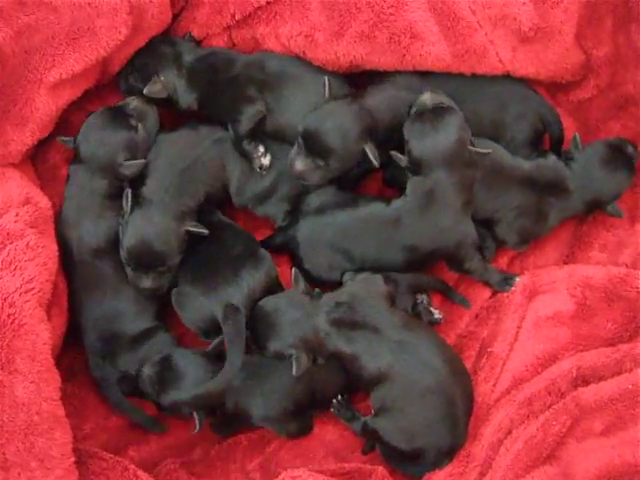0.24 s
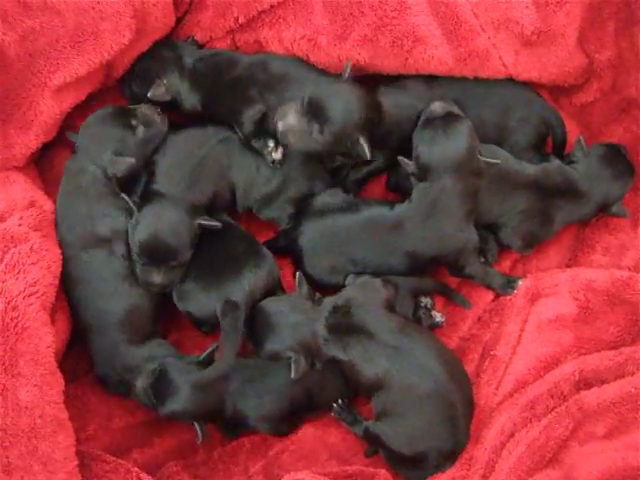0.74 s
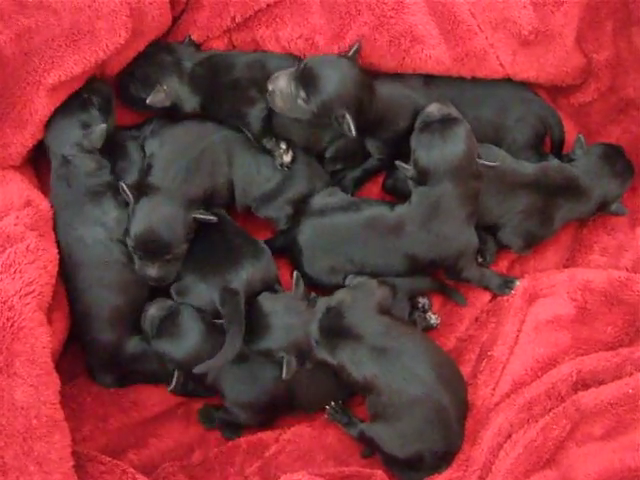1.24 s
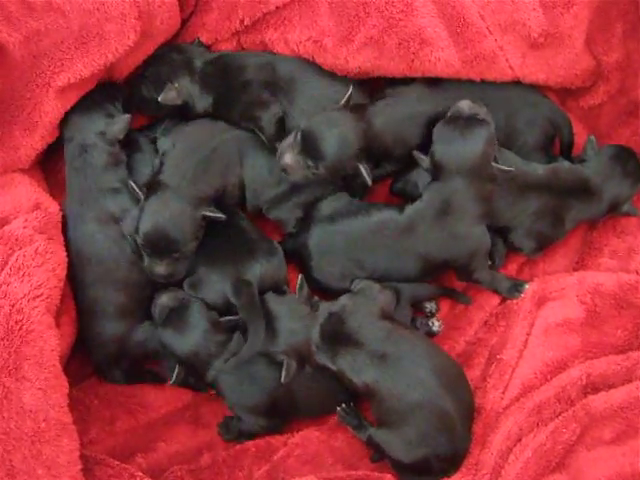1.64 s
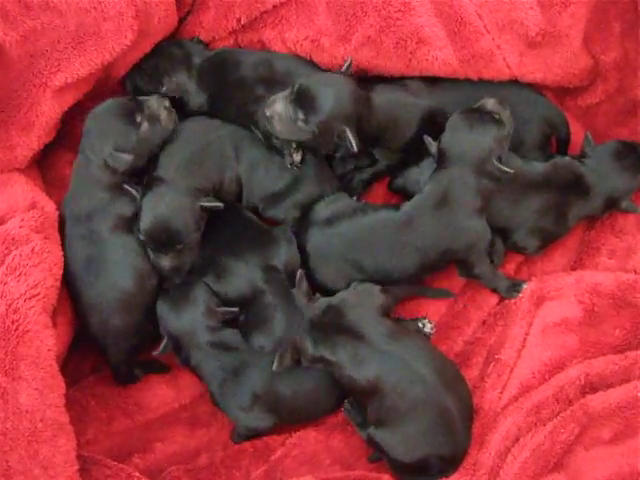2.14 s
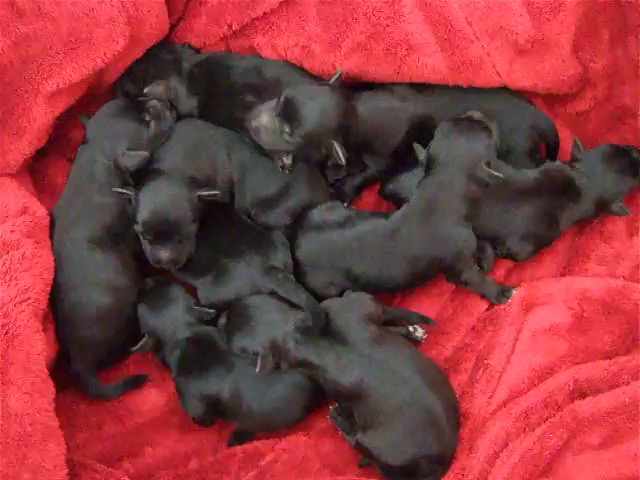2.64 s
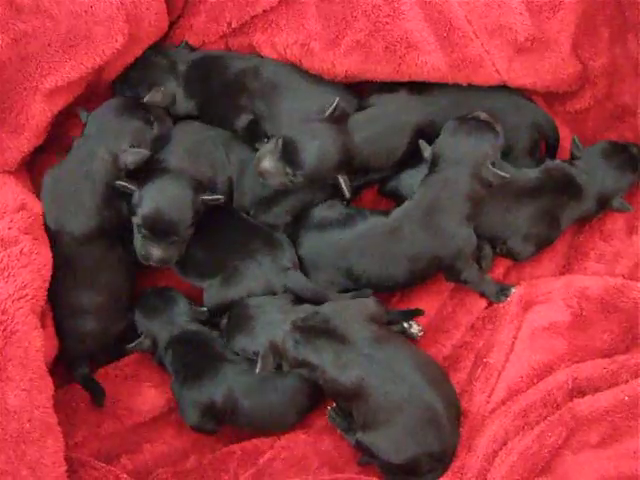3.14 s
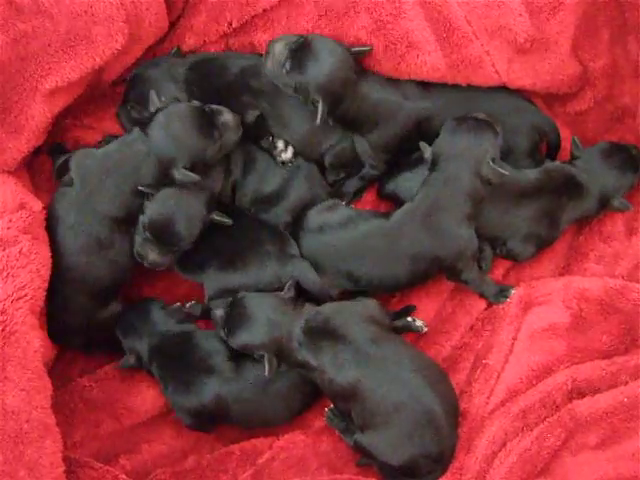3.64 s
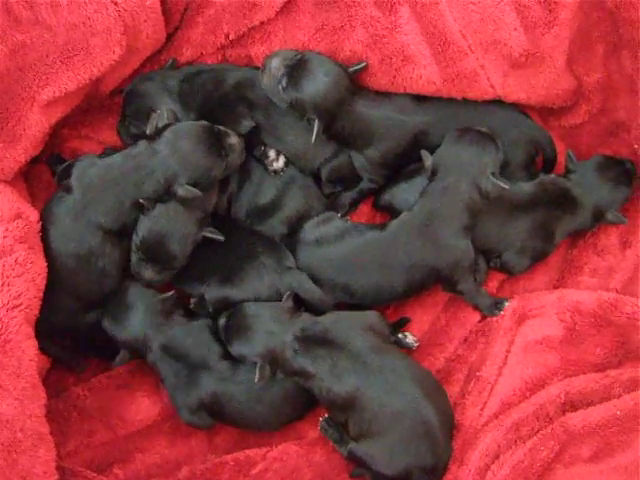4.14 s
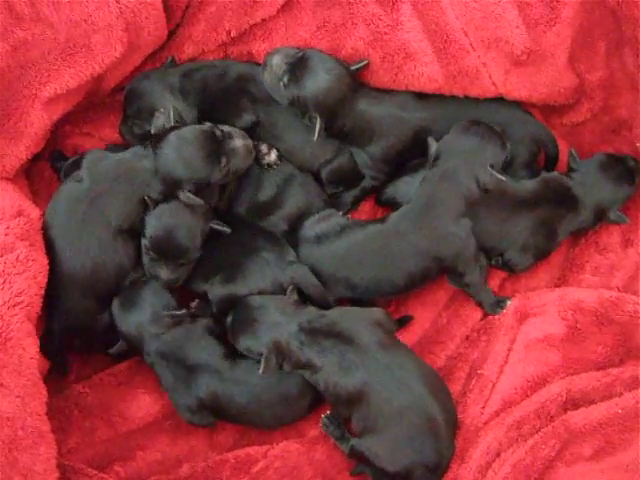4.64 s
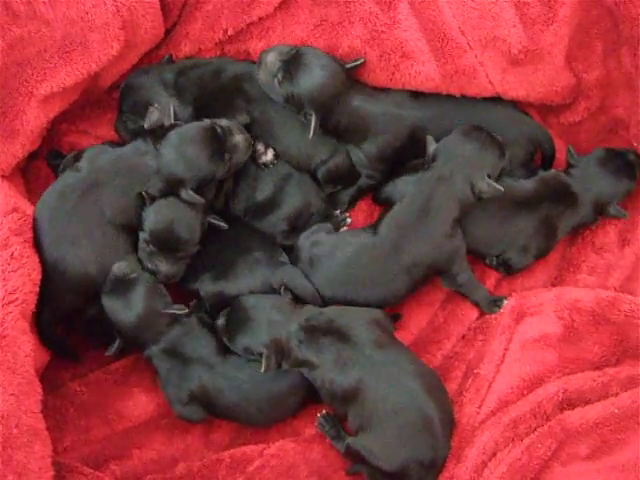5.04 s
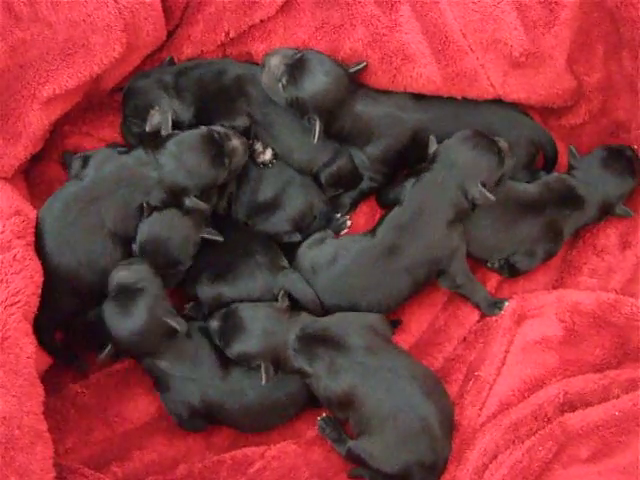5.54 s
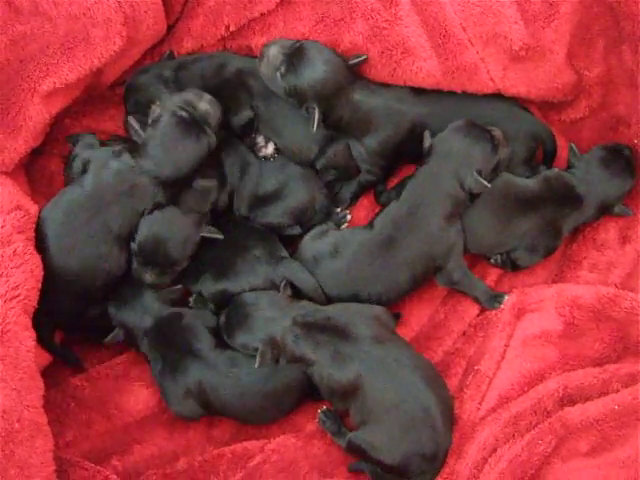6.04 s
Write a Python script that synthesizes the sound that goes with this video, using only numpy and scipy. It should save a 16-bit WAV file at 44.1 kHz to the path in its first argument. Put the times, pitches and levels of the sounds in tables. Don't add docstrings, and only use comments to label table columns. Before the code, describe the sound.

A low, unevenly swelling ventilation hum and soft hiss run throughout in a small furnished room, heard through a close, cheap microphone with limited treble. A very high, clear puppy mew is already sounding and snaps off in a hiccup near 0.27 s. Wet smacks and a hoarse grunt follow around 0.4 to 0.7 s, paws scuff at 0.8 s, with mouth clicks at 1.0 s and fainter rubbing near 1.3 s. A long, falling whine lasts from 1.5 to 2.3 s, its tail wavering, with faint moaning beneath. A short squeak comes at 2.8 s, low grunts around 3.5 s, then brief mews at 3.7 and 4.15 s, the second rising. Another long cry falls from 4.6 to 5.3 s, followed by a grunt, moan and scuff. A rising whimper at 5.55 s leads to stronger grunts from 6.03 s, a smack, and a final mew at 6.16 s, cut off.

```python
import sys
import numpy as np
from scipy import signal
from scipy.fft import rfft, irfft, next_fast_len
from scipy.io import wavfile
from scipy.ndimage import uniform_filter1d

SR = 44100
rng = np.random.default_rng(int(sys.argv[2]) if len(sys.argv) > 2 else 0)


def field_ratio(decibels):
    return 10 ** (np.asarray(decibels, dtype=float) / 20)


def transcribe(u):
    v = np.clip(np.atleast_2d(u).T, -1, 1)
    q = np.round(v * 32767).astype(np.int16)
    wavfile.write(sys.argv[1], SR, q)


N = 277816
TIME = np.arange(N) / SR

# pitch in Hz, width in Hz, level in dB.
DUCTS = [(54.8, 25, -4), (95.2, 18.2, -2), (122, 14, -57.5), (154.8, 16, -58.5), (295, 5.8, -66.5),
         (40, 45, -56)]
# time in seconds, level in dB.
DRAUGHT = [(0.0, -57), (0.09, -46), (1.47, -51), (1.51, -42.5), (2.09, -49.5), (2.17, -40), (2.74, -53),
           (3.07, -39), (3.16, -53.5), (3.93, -45), (3.98, -47.5), (4.42, -40.5), (4.54, -52.5),
           (5.33, -45), (5.86, -47.5), (5.89, -66), (6.09, -44.5), (6.3, -54)]
# frequency in Hz, level in dB per Hz.
AIR_COLOUR = [(110, -28), (180, -3.5), (260, -4.5), (290, -4), (351, -5), (585, -1), (755, -0.5),
              (817, 1.5), (1280, -4.5), (2030, -7.5), (2610, -9.5), (3430, -11.5), (8100, -14),
              (10500, -43), (17800, -120)]

# start in seconds, end in seconds, extra pitch at the onset in Hz,
# glide at the end in Hz, frequency ratio from the length of the throat and mouth (no unit).
MEW_EDGES = [
    (0, 0.268, -2.5, -20.5, 1.03),
    (1.522, 2.302, -3, -130, .98),
    (2.795, 2.943, 48.5, 24, 1.04),
    (3.691, 3.887, 218, 30.5, 1.107),
    (4.137, 4.379, 200, 369, 1.05),
    (4.628, 5.301, 329, -140, 1.002),
    (5.546, 5.881, -35, 299, 0.95),
    (6.159, 6.308, 238.5, -3.5, 1.036),
]
# upper resonance at first in Hz, later in Hz, time of the shift in seconds,
# its lift in dB, level of the valley below it in dB.
MOUTHS = [(6300, 7500, 0.076, -7.5, -6), (6080, 7600, 2.08, 4.5, 2.5), (6360, 3500, 3.9, 29, -1),
          (7000, 7300, 2.9, 10, 0.5), (7100, 7800, 5.9, 14.5, -3), (6000, 7100, 5.03, 3.5, -2),
          (6200, 6700, 5.64, 10, -8.5), (6500, 7100, 3.9, 13, -9.5)]
# time in seconds,
# pitch in Hz, effort in dB, slope of the fold pulses in dB per octave.
COURSE_1 = [(0.0, 1764, -20.5, -1), (0.028, 1742, -18.5, -4.5), (0.048, 1600, -19.5, -2.5),
            (0.092, 1506, -23, 0), (0.128, 1474, -22, -2.5), (0.17, 1634, -21, -2),
            (0.214, 1706, -21.5, -1.5), (0.242, 1638, -25, -3.5), (0.25, 1568, -24.5, -5)]
COURSE_2 = [(1.552, 1622, -30, -5.5), (1.56, 1514, -30, -7.5), (1.606, 1242, -25.5, -8),
            (1.656, 1125, -30, -4.5), (1.702, 1101, -26, -7.5), (1.778, 1222, -20, -7),
            (1.814, 1237, -14, -10), (1.978, 1160, -25.5, -3.5), (2.09, 1038, -28.5, -8),
            (2.11, 1058, -29.5, -6), (2.172, 1104, -33, -5.5), (2.206, 1064, -37.5, -2.5),
             (2.23, 1109, -36.5, -4.5), (2.26, 1110, -36, -8)]
# seconds, Hz, dB, dB per octave.
COURSE_3 = [(2.81, 1530, -33.5, -26), (2.832, 1405, -28, -15.5), (2.876, 1520, -33, -20),
            (2.896, 1610, -39, -14), (2.935, 1385, -34, -17)]
COURSE_4 = [(3.715, 1170, -24.5, -11), (3.733, 1219, -21.5, -7.5), (3.765, 1058, -30, -6),
            (3.819, 1032, -34.5, -5), (3.845, 958, -33.5, -6), (3.853, 875, -39, -10),
            (3.87, 856, -34, -8.5)]
COURSE_5 = [(4.16, 1112, -32.5, -10), (4.174, 1134, -28.5, -10), (4.24, 1229, -22.5, -5.5),
            (4.272, 1380, -29.5, -10), (4.31, 1350, -33, -9.5), (4.335, 1300, -36.5, -11)]
COURSE_6 = [(4.66, 1328, -31.5, -5.5), (4.7, 1308, -27.5, -0.5), (4.756, 1263, -21, -3.5),
            (4.882, 1248, -23, -3), (4.956, 1201, -22, -5), (5.078, 975.5, -31.5, -3.5),
            (5.124, 953, -24.5, -9.5), (5.18, 999, -33, -5.5), (5.255, 958, -29.5, -8)]
COURSE_7 = [(5.56, 925, -32, -11), (5.58, 947, -29, -6), (5.616, 1044, -27, -5), (5.658, 1090, -28, -7),
            (5.686, 1131, -30, -8), (5.708, 1176, -34, -5.5), (5.768, 1115, -36.5, -9.5),
            (5.784, 1133, -39.5, -8.5), (5.84, 1275, -39, -8.5)]
COURSE_8 = [(6.185, 1083, -30.5, -9.5), (6.221, 1133, -23.5, -10), (6.295, 1226, -26, -10.5)]
# frequency in Hz, level in dB.
TRACT = [(850, -9), (1100, 4), (1500, -9.5), (2000, -3), (2450, -2), (3050, -6), (3900, -23), (5200, -35.5)]

# time in seconds, peak in dB, centre in Hz, width in Hz.
SMACKS = [(.072, -54, 6700, 1500), (0.26, -40, 3000, 2500), (.432, -28.5, 870, 400),
          (.535, -48, 2210, 2500), (1.015, -35.5, 1600, 3000), (1.012, -56, 4610, 1200),
          (1.035, -43, 210, 120), (1.041, -44.5, 4580, 900), (1.761, -30, 3900, 3500),
          (1.844, -29, 3700, 5000), (2.205, -43, 7450, 201), (2.301, -38, 2800, 2200),
          (3.715, -48.5, 6020, 250), (3.722, -43, 4460, 1500), (4.629, -38.5, 1810, 500),
          (5.546, -44, 3003, 600), (6.113, -25, 840, 300), (6.276, -44, 6260, 1500)]
# time in seconds, peak in dB, start pitch in Hz,
# end pitch in Hz, level of the second partial in dB.
CATCHES = [
    (0.259, -28, 1550, 1005, -8),
    (.322, -45, 1110, 1026, -36),
    (2.294, -36.5, 1474, 1000, -1),
    (2.946, -41, 930, 880, -9),
    (3.884, -39, 796, 697, -5.5),
    (5.296, -31, 856, 1042, -12),
]
# start in seconds, length in seconds, peak in dB, pulses per second in Hz,
# mouth opening in dB.
GRUNTS = [
    (.37, .32, -49, 271.7, 0),
    (0.896, .14, -71, 232, 10.5),
    (3.44, .14, -45, 199.6, -8),
    (3.56, 0.1535, -48.5, 203, -6.5),
    (3.864, 0.051, -56, 200, -8),
    (5.29, 0.215, -49.5, 185, 2.5),
    (5.489, .05, -57.5, 193.6, 2),
    (6.031, 0.22, -40, 275, -2),
    (6.152, .16, -47, 278.5, 0),
]
# frequency in Hz, width in Hz, level in dB.
THROAT = [(810, 85, 0), (1140, 140, 3), (1650, 300, -10), (2300, 450, -11)]
# time in seconds, peak in dB, centre in Hz, width in Hz.
SCUFFS = [
    (.795, -36, 1200, 2600),
    (.8, -43, 4200, 1500),
    (1.27, -43, 3000, 3000),
    (1.292, -39.5, 3030, 3500),
    (2.546, -44, 2640, 3500),
    (3.24, -43.5, 2600, 3500),
    (5.285, -42.5, 2940, 1200),
    (5.452, -39, 3120, 2000),
]
# start in seconds, length in seconds, pitch in Hz, level in dB.
MOANS = [
    (1.68, .11, 620, -47.5),
    (2.062, 0.051, 660, -49),
    (4.14, 0.097, 750, -46),
    (4.64, 0.071, 750, -51.5),
    (4.63, 0.14, 1150, -52.5),
    (5.322, .14, 773, -50.5),
]
# frequency in Hz, level in dB.
MIRROR = [(8000, -3), (8400, -12), (8800, -25), (9200, -60.5)]

AIR_DB, SURGE_DB = -49.5, -1.65
NASAL_HZ, NASAL_WIDTH_HZ, NASAL_DEPTH = 1197, 118, 0.77
ONSET_S, ATTACK_S = .013, 0.012
ENDING_S, ENDING_HOLD, RELEASE_S = .022, 1.8, .014
MOUTH_WIDTH_HZ, MOUTH_SHIFT_S, MOUTH_FOLLOWS_PITCH = 750, 0.027, 0.25
VALLEY_FILLS_S, THIRD_FADES_HZ = .17, 3700
SMACK_S, SCUFF_S, RING_CYCLES = .002, .008, 2.2
CATCH_S = .019
GRUNT_SKEW, WAVER_DB = 0.92, 1.5
MOAN_DIP = 0.051
ROOM_T60_S, ROOM_DB, ROOM_DULL_HZ = .28, -16, 3200
CAMERA_RATE_HZ, OFFSET = 16000, -.0024


def shape(x, gain):
    size = next_fast_len(len(x) + 4096)
    f = np.arange(size // 2 + 1) * SR / size + 1e-3
    return irfft(rfft(x, size) * gain(f), size)[:len(x)]


def peak(f, hz, width):
    return 1 / (1 + 1j * (f / hz - hz / f) * hz / width)


def unit(x):
    return x / np.sqrt(np.mean(x ** 2))


def colour(table, f):
    hz, db = np.transpose(table)
    return field_ratio(np.interp(np.log(f), np.log(hz), db))


def walk(rate):
    return unit(shape(rng.standard_normal(N), lambda f: 1 / (1 + (f / rate) ** 2)))


def during(start, end):
    span = slice(int(start * SR), int(end * SR))
    return span, TIME[span]


def hum():
    flow_db = np.interp(TIME, *np.transpose(DRAUGHT))
    out = np.zeros(N)
    for i, (hz, width, db) in enumerate(DUCTS):
        swell_db = flow_db + SURGE_DB * walk(1.5) if i < 2 else walk(1.5)
        ringing = unit(shape(rng.standard_normal(N), lambda f: peak(f, hz, width) ** 2))
        out += field_ratio(db + swell_db) * ringing
    return out


def air():
    noise = rng.standard_normal(N)
    rush = field_ratio(AIR_DB) * unit(shape(noise, lambda f: colour(AIR_COLOUR, f) * (f > 170)))
    middle = shape(rush, lambda f: peak(f, 1300, 900))
    return rush + (field_ratio(1.1 * walk(5)) - 1) * middle


def mews():
    out, shimmer, jitter = np.zeros(N), walk(51), 1 + .002 * walk(35)
    patchy = [walk(14) for _ in range(6)]
    courses = (COURSE_1, COURSE_2, COURSE_3, COURSE_4,
               COURSE_5, COURSE_6, COURSE_7, COURSE_8)
    for course, edges, mouth in zip(courses, MEW_EDGES, MOUTHS):
        start, end, onset_hz, ending_hz, ratio = edges
        from_hz, to_hz, shift_s, lift_db, valley_db = mouth
        span, t = during(start, end)
        s, pitch_hz, effort_db, slope = np.transpose(course)
        slope_db = np.interp(t, s, slope)

        hz = np.interp(t, s, pitch_hz)
        for _ in range(2):
            hz = uniform_filter1d(hz, size=500, mode="nearest")
        glide = np.clip(ENDING_HOLD - (end - t) / ENDING_S, 0, 1)
        hz = hz + onset_hz * np.exp(-((t - start) / ONSET_S) ** 2)
        hz = (hz + ending_hz * glide ** 2 * (3 - 2 * glide)) * jitter[span]

        age = t - start + (start < .005)
        left = end - t + (end > TIME[-300])
        gate = np.clip(np.minimum(age / ATTACK_S, left / RELEASE_S), 0, 1)

        mouth_hz = from_hz + (to_hz - from_hz) / (1 + np.exp((shift_s - t) / MOUTH_SHIFT_S))
        mouth_hz = mouth_hz * (hz / np.median(hz)) ** MOUTH_FOLLOWS_PITCH
        valley = field_ratio(valley_db) * np.clip(age / VALLEY_FILLS_S, .1, 1)

        phase, tone = 2 * np.pi * np.cumsum(hz) / SR, 0
        for k in range(1, 10):
            lips = k * gate ** ((k - 1) / 2)
            nose = 1 - NASAL_DEPTH * np.abs(peak(k * hz, NASAL_HZ, NASAL_WIDTH_HZ)) ** 2
            gain = lips * colour(TRACT, k * hz * ratio) * field_ratio(slope_db * np.log2(k)) * nose
            if k == 3:
                below = np.clip(THIRD_FADES_HZ / (k * hz), 0, 1) ** 9
                gain = gain * (below + (1 - below) * valley)
            if k > 3:
                near = np.abs(peak(k * hz, mouth_hz, MOUTH_WIDTH_HZ)) ** 3
                away = valley * np.clip(5800 / (k * hz), 0, 1) ** 6
                gain = gain * field_ratio(3.0 * patchy[k - 4][span]) * (away + field_ratio(lift_db) * near)
            tone = tone + gain * np.sin(k * phase + (k - 1) ** 2)
        loudness = field_ratio(np.interp(t, s, effort_db) + 1.0 * shimmer[span])
        out[span] = np.sqrt(2) * tone * gate * loudness
    return out


def bursts(table, contact_s):
    out, t = np.zeros(N), np.arange(2500) / SR
    for s, db, hz, width in table:
        decay_s = contact_s + RING_CYCLES / width
        noise = rng.standard_normal(len(t)) * np.exp(-t / decay_s)
        burst = shape(noise, lambda f: peak(f, hz, width) ** 3)
        first = int(s * SR)
        out[first:][:len(t)] += (field_ratio(db) * burst / np.abs(burst).max())[:N - first]
    return out


def smacks():
    return bursts(SMACKS, SMACK_S)


def catches():
    out = np.zeros(N)
    u = np.arange(int(CATCH_S * SR)) / (CATCH_S * SR)
    for s, db, from_hz, to_hz, second_db in CATCHES:
        hz = to_hz + (from_hz - to_hz) * np.exp(-5 * u)
        phase = 2 * np.pi * np.cumsum(hz) / SR
        tone = np.sin(phase) + field_ratio(second_db) * np.sin(2 * phase)
        out[int(s * SR):][:len(u)] += field_ratio(db) * np.sin(np.pi * u ** .7) * tone
    return out


def grunts():
    hz, gain, opening = np.full(N, 200.), np.zeros(N), np.zeros(N)
    for start, length, db, rate_hz, open_db in GRUNTS:
        span, t = during(start, start + length)
        progress = np.abs(t - start) / length
        gain[span] += field_ratio(db) * np.abs(np.sin(np.pi * progress ** GRUNT_SKEW)) ** 1.2
        hz[span], opening[span] = rate_hz, field_ratio(open_db)

    cycle = np.cumsum(hz * (1 + .03 * walk(60)) / SR)
    size = field_ratio(2.5 * rng.standard_normal(N // 20))[cycle.astype(int)]
    pulses = unit(size * np.diff(np.floor(cycle), prepend=0))
    source = pulses + .9 * rng.standard_normal(N)

    rings = []
    for centre, width, db in THROAT:
        ring = unit(shape(source, lambda f: peak(f, centre, width) * peak(f, centre, 3 * width)))
        rings.append(field_ratio(db + WAVER_DB * walk(30)) * ring)
    low, second, third, fourth = rings
    return (low + opening * (third - second - fourth)) * gain


def scuffs():
    return bursts(SCUFFS, SCUFF_S)


def moans():
    out = np.zeros(N)
    for start, length, hz, db in MOANS:
        span, t = during(start, start + length)
        arch = np.sin(np.pi * (t - start) / length)
        phase = 2 * np.pi * np.cumsum(hz * (1 - MOAN_DIP * arch)) / SR
        tone = np.sin(phase) + field_ratio(-20.5) * np.sin(2 * phase)
        out[span] += np.sqrt(2 * np.abs(arch)) * field_ratio(db) * tone
    return out


def room(x):
    t = np.arange(SR // 2) / SR
    decay = np.exp(-np.log(1000) * t / ROOM_T60_S)
    tail = rng.standard_normal(len(t)) * decay * np.clip(t / 0.014 - .3, 0, 1)
    tail = shape(tail, lambda f: 1 / (1 + 1j * f / ROOM_DULL_HZ))
    return field_ratio(ROOM_DB) * signal.fftconvolve(x, tail / np.sqrt(np.sum(tail ** 2)))[:N]


def scene():
    litter = mews() + smacks() + catches() + grunts() + scuffs() + moans()
    return (hum() + air() + litter + room(litter))[None]


def low_pass(x):
    return signal.sosfilt(signal.butter(12, 8820, fs=SR, output="sos"), x)


def record(dry):
    half_hz = CAMERA_RATE_HZ / 2
    kept = shape(dry[0], lambda f: f < half_hz)
    flipped = 2 * kept * np.cos(2 * np.pi * CAMERA_RATE_HZ * TIME)
    mirror = shape(flipped, lambda f: colour(MIRROR, f) * (f > half_hz))
    return low_pass((kept + mirror + OFFSET)[None])


dry = scene()
out = record(dry)
transcribe(out)
```